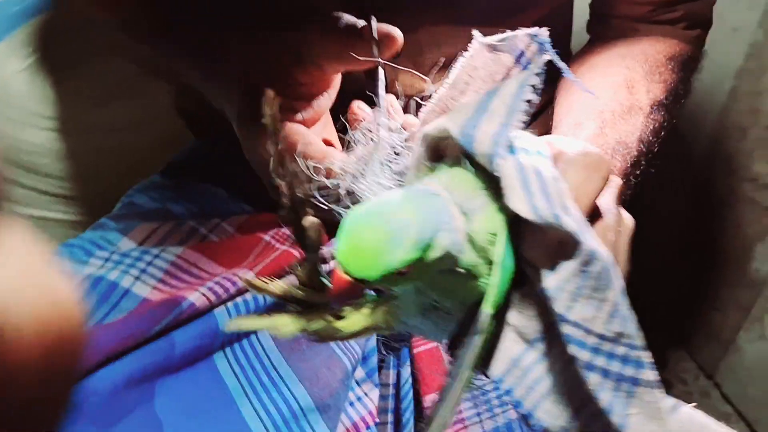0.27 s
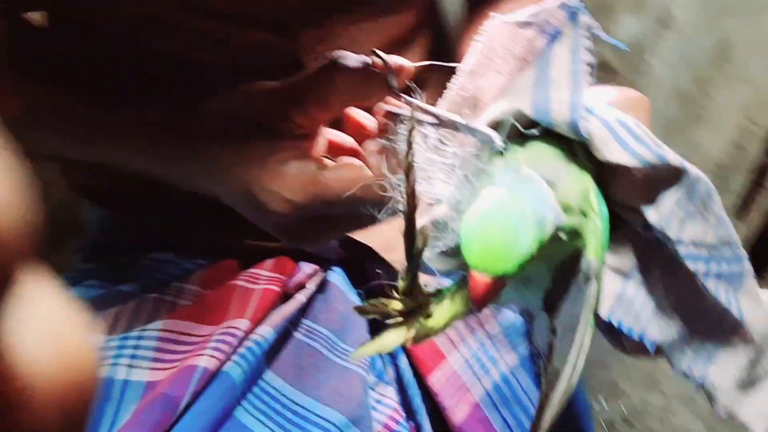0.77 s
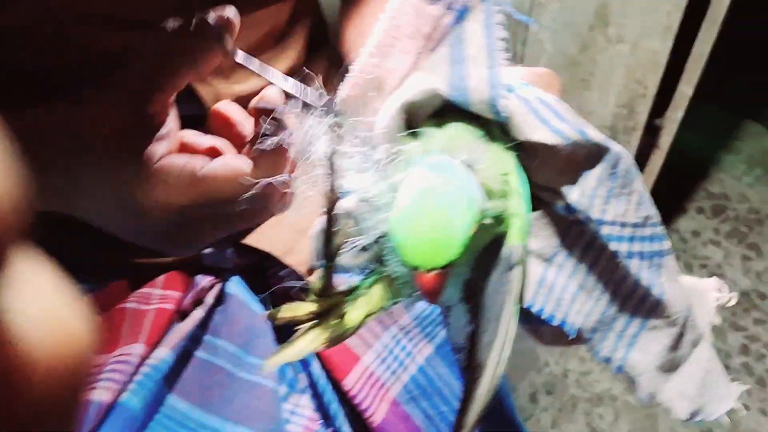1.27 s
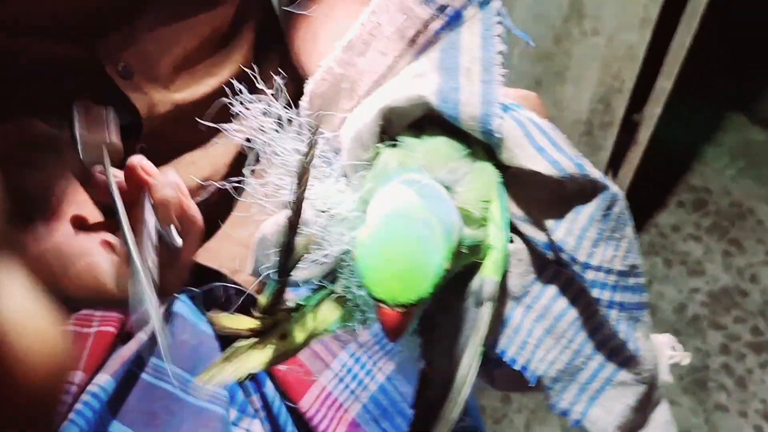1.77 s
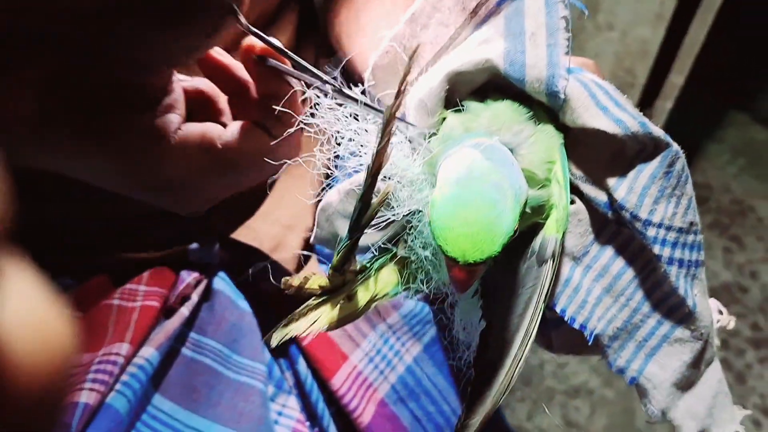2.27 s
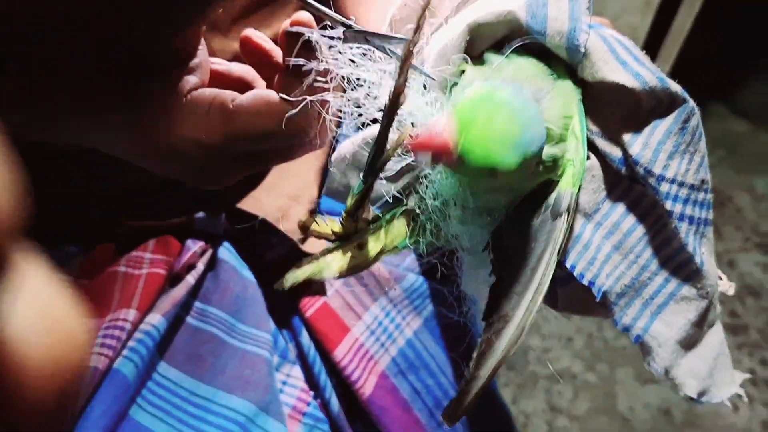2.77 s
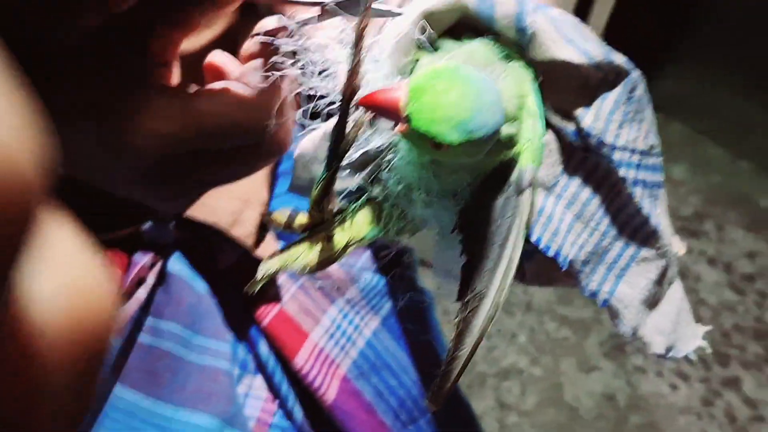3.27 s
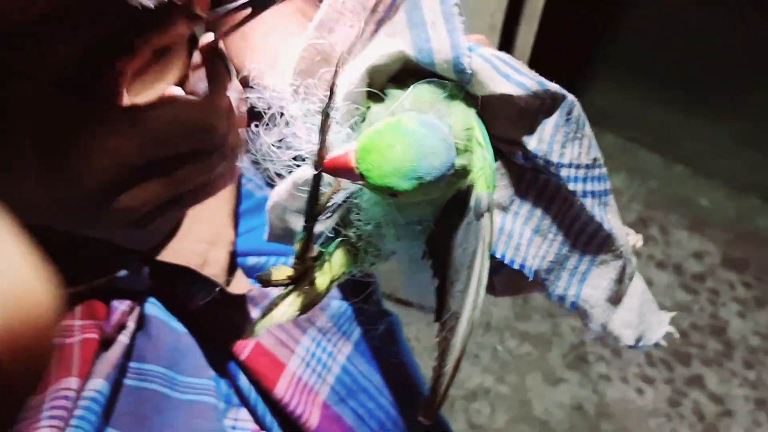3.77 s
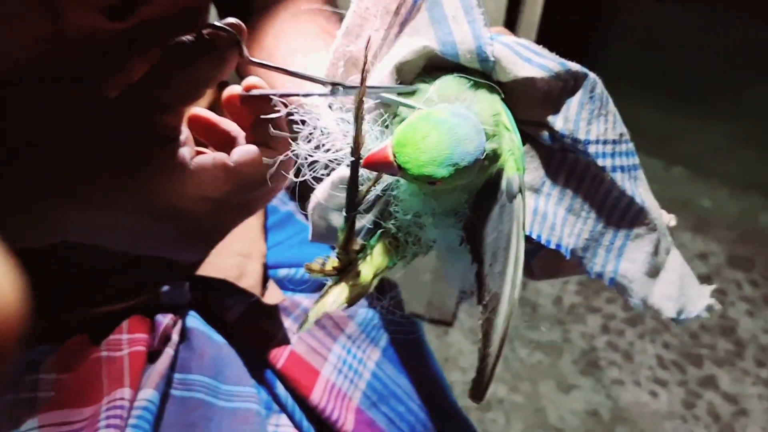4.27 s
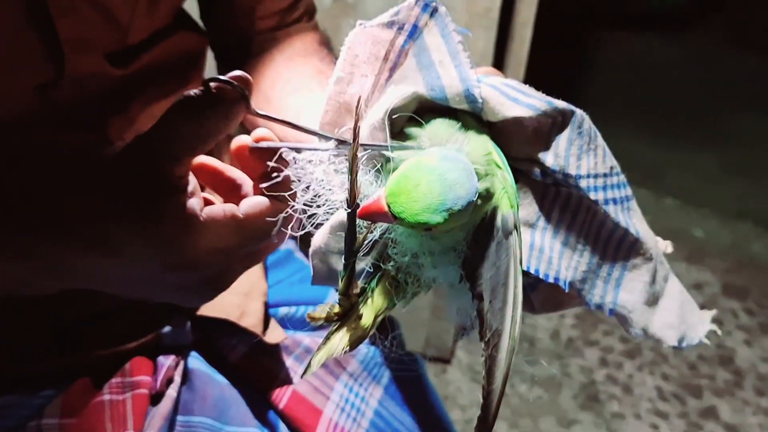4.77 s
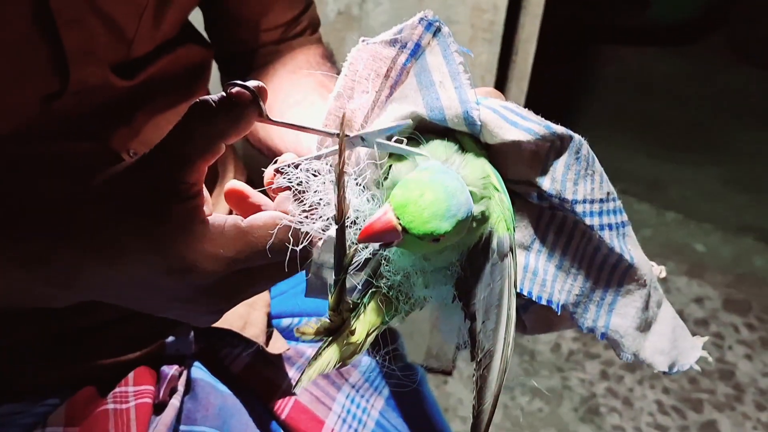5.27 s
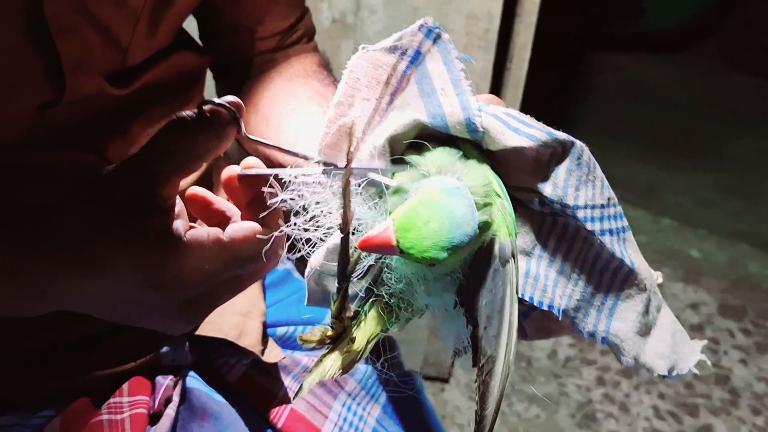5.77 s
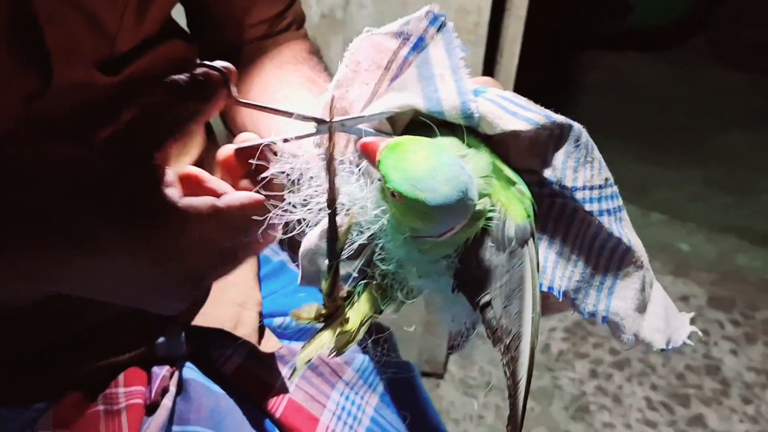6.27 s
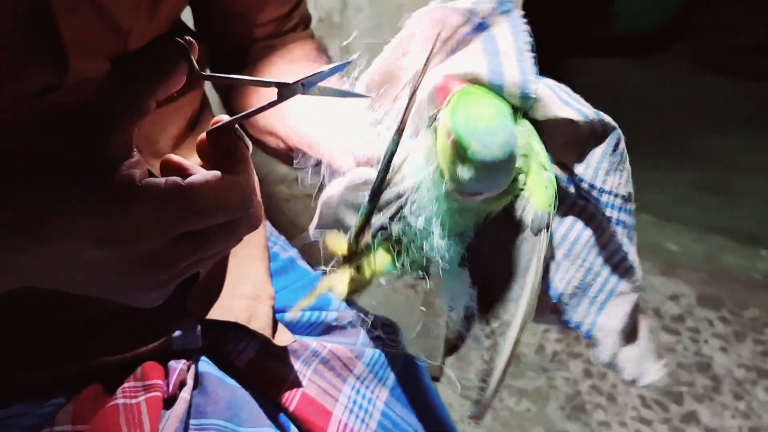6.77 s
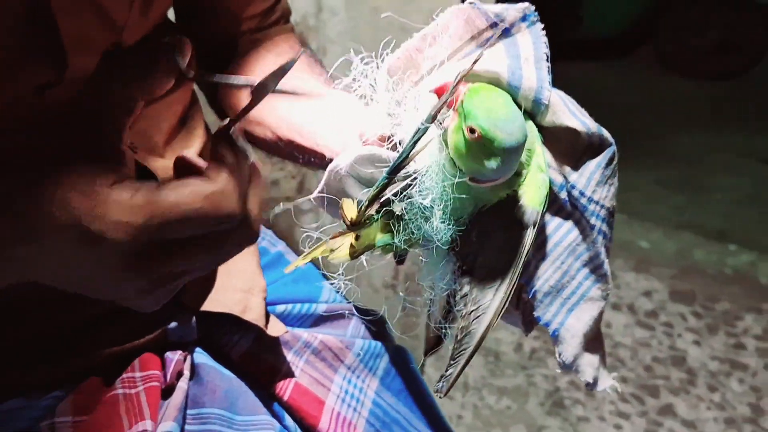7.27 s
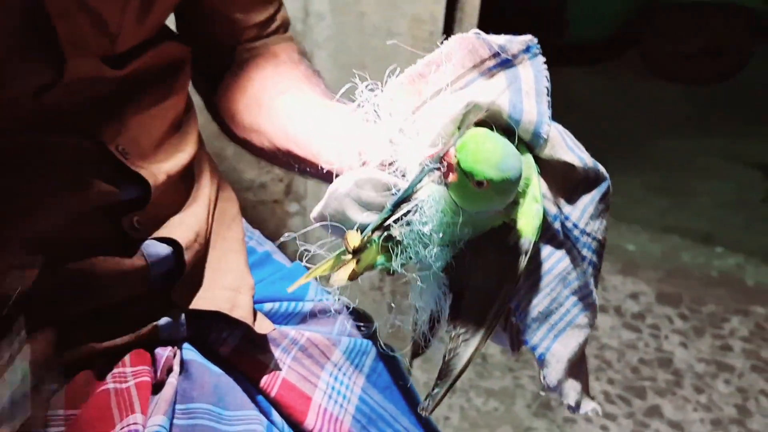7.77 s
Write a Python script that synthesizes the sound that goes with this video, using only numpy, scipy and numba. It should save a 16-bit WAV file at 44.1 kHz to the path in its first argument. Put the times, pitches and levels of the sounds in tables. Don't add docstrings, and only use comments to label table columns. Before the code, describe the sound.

A held parakeet screeches harshly eight times, each a rasping half-second burst, over night insects, faint cloth rustle and tiny scissor ticks.

```python
import sys
import numpy as np
from scipy import signal
from scipy.fft import rfft, irfft
from scipy.io import wavfile
from numba import njit

SR = 44100
rng = np.random.default_rng(int(sys.argv[2]) if len(sys.argv) > 2 else 0)


def master_out(mix):
    frames = np.transpose(np.atleast_2d(mix))
    ceiling = np.clip(frames, -1, 1)
    pcm = np.round(ceiling * 32767).astype(np.int16)
    wavfile.write(sys.argv[1], SR, pcm)


def ratio_of_db(decibels):
    return 10 ** (np.asarray(decibels, float) / 20)


N = 353285
TIME = np.arange(N) / SR
FREQ = np.fft.rfftfreq(N, 1 / SR) + 1e-9

# first burst in seconds, last burst in seconds, number of bursts,
# lag of the middle bursts behind an even pace in ms, extra lag early and lead late in ms.
SCREECHES = [
    (-.0429, .4653, 49, 3.7, -1.5),
    (2.6356, 3.2209, 57, 3.1, 2.2),
    (3.565, 4.0878, 49, 6, 2.2),
    (4.4321, 4.9451, 46, -3.3, .3),
    (5.3242, 5.8996, 54, 2.5, 1.4),
    (6.1409, 6.5983, 43, 1.7, 0),
    (6.8736, 7.3596, 46, .5, 1.7),
    (7.7323, 8.2489, 45, 0, 0),
]
# top rate in Hz, sag in Hz per second.
SNAP_RATES = [(1090, 340), (1065, 210), (1055, 280), (1060, 330), (1075, 250), (1190, 540), (1100, 370),
              (1060, 420)]
# first harmonic in dB, swell towards the middle in dB, fade at the end
# in dB, loss of treble from start to end in dB, background turned down after it in dB.
EFFORTS = [(-35, 0, 10, 3, 9.5), (-37.5, -0.5, 9.5, 0.5, 12.5), (-37.5, 1.5, 11.5, 1, 7),
           (-33, 2.5, 11.5, 6.5, 8), (-34.5, 1, 8, 6.5, 8), (-32, 0.5, 4.5, -1.5, 7.5),
           (-32, 2, 12.5, -2.5, 7.5), (-33.5, 5, 3, 2, 4)]
# beak resonance in Hz, throat, beak and rasp in dB beside
# the first harmonic, left minus right in dB.
HEAD_POSES = [(5140, 6.5, 14.5, 1.5, 3), (5650, 8, 15.5, 4.5, 3.5), (5400, 5.5, 15.5, 2, 3),
              (6450, 4, 14.5, 5, 1), (5830, 4.5, 14, 6.5, 1), (5800, 4.5, 11, 3, 1), (5370, 5, 12, 1.5, 1),
              (4860, 5.5, 14.5, 0, 2)]
ATTACKS_DB = [6.4, 5.1, 4.9, 4.6, 4.2, 3.9, 3.3, 8.8]
STRAIN = [0.48, 1.18, 1]
DULLING = [.6, 1.2, 0.47]
# frequency in Hz, gain in dB.
TRACT_TONE = [(150, -36), (200, -31.5), (300, -27.5), (600, -34.5), (780, -15), (1300, -14.5), (2100, 1.5),
              (3300, 7), (5200, 7.5), (7600, 0.5), (8500, -16), (9300, -25.5), (10500, -26.5), (15900, -31)]
VOICE_BORDERS_HZ = [1550, 3700, 9000]
# frequency in Hz, gain in dB.
YARD_TONE = [(500, -18.5), (1000, 1), (2000, 7), (5000, -2.5), (8000, -7), (12000, 6), (16000, -16)]
# start in seconds, level in dB, pitch in Hz.
TICKS = [
    (1.51, -45, 1570),
    (1.3, -58, 1440),
    (1.1, -62, 2700),
    (1.9, -58, 4800),
]
# start in seconds, level in dB, length in seconds, centre in Hz,
# thud beside the rub in dB.
RUSTLES = [
    (0.641, -59, 0.11, 3350, -26),
    (0.89, -60, 0.14, 2600, -9),
    (1.362, -60, 0.092, 3420, -11.5),
    (1.486, -58, 0.095, 1910, -30),
    (1.706, -71, 0.021, 3000, 5),
    (3.494, -69.5, 0.023, 4000, -18),
    (5.043, -84.5, .04, 1500, -24.5),
    (7.597, -67, 0.086, 3960, -21),
]
# middle in seconds, level in dB, length in seconds.
CHIRPS = [(0.8, -67, 0.052), (1.124, -63, 0.053), (1.53, -69.5, 0.18), (1.906, -66.5, 0.17),
          (2.193, -57.5, 0.063), (2.562, -57, 0.06), (3.302, -61, 0.053), (4.398, -57.5, 0.034),
          (5.2, -61, 0.061), (5.95, -60, 0.051), (6.674, -64, 0.054)]
# frequency in Hz, gain in dB.
AIR_TONE = [(130, -37), (170, -9.5), (400, -13.5), (800, -16.5), (1200, -18), (3000, -17), (4500, -17.5),
            (5200, -17.5), (8500, -19), (9400, -34), (11500, -39.5), (15900, -43)]
# middle in seconds, change in dB, length in seconds.
BREEZE = [
    (1.25, -4.5, 0.11),
    (2.0, 3, .2),
    (2.494, -0.5, .12),
    (3.4, -0.5, .1),
    (4.227, -5, 0.057),
    (5.078, 4.5, 0.065),
]
# time in seconds, firing rate in Hz, level of the drone in dB.
MOTOR = [
    (4.3, 36.5, -56.5),
    (4.81, 37.72, -52.5),
    (5.87, 38.8, -54.5),
    (6.56, 39.6, -51.5),
    (7.74, 43.4, -61),
    (8.01, 43.2, -50),
]
# multiple of the firing rate, level in dB.
MOTOR_HARMONICS = [(1, -19.5), (2, -6.5), (3, -7.5)]
# middle in seconds, rise in dB, length in seconds.
HUM_SWELLS = [
    (0.0, 8.5, .15),
    (2.004, 7.5, 0.22),
    (4.1, 2, 0.14),
    (5.702, 8.5, 0.13),
    (6.498, 6.5, 0.1),
]
# frequency in Hz, gain in dB.
HUM_TONE = [(12, -52.5), (20, -29), (41, -5), (70, 1.5), (119, -9), (131, -6), (156, -20.5), (182, -38),
            (200, -29.5), (260, -62.5), (440, -120)]


def parakeet():
    low_db, push_db, beak_hz, throat_db, beak_db, rasp_db, pan_db = effort()
    beat, snap_hz, burst_db = bursts()
    snaps = voice_box(beat, snap_hz, burst_db)
    choke = shape(clicks(beat, np.ones(len(beat))), band(0, 98))
    puffs = choke * pair(shape(noise(), FREQ ** 2 / (FREQ ** 2 + 7500 ** 2)), .1)
    smear_s, smear_hz = .0004, 4500
    smear = np.exp(1j * smear_s * smear_hz * np.cos(2 * np.pi * FREQ / smear_hz))
    source = shape(unit(snaps) + ratio_of_db(-5.5) * unit(puffs), causal(colour(TRACT_TONE)) * smear)
    source += np.array([ring(x, beak_hz, 1200.) for x in source])

    pipe_hz = 0.93 * np.interp(TIME, beat, snap_hz)
    lifted = shape(source, 1 + (787 / FREQ) ** 4 / (1 + (560 / FREQ) ** 8))
    pipe = np.array([ring(x, pipe_hz, 545.) for x in lifted])

    above = [1 / (1 + (edge / FREQ) ** 12) for edge in VOICE_BORDERS_HZ]
    regions = [1 - above[0], above[0] - above[1], above[1] - above[2], above[2]]
    voices = (pipe + 0.74 * source, source, source, source)
    region_db = (0, throat_db, beak_db, rasp_db)
    shades = (0.34, 0.14, 2.48, 0.33)
    sounding = np.mean(shape(choke, band(0, 30)) > .5 * choke.mean())
    out = ratio_of_db(push_db - 65) * unit(pair(shape(noise(), band(380, 150)), .85))
    for voice, region, rel_db, shade in zip(voices, regions, region_db, shades):
        layer = unit(shape(voice, region)) * np.sqrt(sounding)
        out = out + layer * ratio_of_db(low_db + rel_db + shade * np.array([pan_db, -pan_db]) / 2)
    port_lag_s = .00009
    return np.array([out[0], shape(out[1], np.exp(-2j * np.pi * FREQ * port_lag_s))])


def voice_box(beat, snap_hz, burst_db):
    rise_s, fall_s, lead_s = 0.0011, 0.0019, 0.000401
    chance = rng.standard_normal((len(beat), 3, 11))
    period = (1 + .02 * chance[:, 2, :1]) / (1.035 * snap_hz[:, None])
    step = np.arange(-5, 6)
    place = step + .015 * step ** 2 + .025 * chance[:, 0] + .16 * chance[:, 2, 1:2]
    offset = place * period - lead_s
    swell = np.exp(-.5 * np.abs((offset + lead_s) / np.where(step < 0, rise_s, fall_s)) ** 3.4)
    swell *= ratio_of_db(4 * (-1.) ** step + burst_db[:, None])
    scatter_db = 1.3 * chance[:, 1] + .8 * chance[:, 2, 2:3]
    return clicks(beat[:, None] + offset, swell * ratio_of_db(scatter_db))


def bursts():
    pickup_s, pickup_db, stumble_s = .0055, -5, .0002
    rows = []
    for (start, end, count, lag_ms, skew_ms), (top_hz, sag) in zip(SCREECHES, SNAP_RATES):
        u = np.arange(count + 1) / count
        lag_s = (4 * lag_ms + 10 * skew_ms * (1 - 2 * u)) * u * (1 - u) / 1000
        t = np.r_[start - pickup_s, start + (end - start) * u + lag_s]
        t = t + stumble_s * rng.standard_normal(len(t))
        scoop = 300 * np.exp(-np.maximum(t - start, 0) / .012)
        droop = 110 * np.exp((t - end) / .045)
        hz = top_hz - sag * (t - start) - scoop - droop
        level_db = pickup_db * (t < start - pickup_s / 2)
        rows.append(np.array([t, hz, level_db])[:, (t > 0) & (t < N / SR)])
    return np.hstack(rows)


def effort():
    start, end = np.transpose(SCREECHES)[:2]
    which = np.searchsorted(start - .06, TIME) - 1
    age = TIME - start[which]
    u = np.clip(age / (end - start)[which], 0, 1)
    top_db, swell_db, fade_db, dull_db = np.transpose(EFFORTS)[:4, which]
    beak_hz, throat_db, beak_db, rasp_db, pan_db = np.transpose(HEAD_POSES)[:, which]
    attack_db = np.array(ATTACKS_DB)[which] * np.exp(-np.maximum(age, -.03) / 0.014)
    push = -attack_db - swell_db * (1 - u) ** 2 - fade_db * u ** 6.03
    upper = [db + strain * push + share * dull_db * (.5 - u)
             for db, strain, share in zip((throat_db, beak_db, rasp_db), STRAIN, DULLING)]
    release_db = 599 * np.maximum(TIME - end[which], 0)
    low_db = top_db + push - release_db
    return low_db, low_db - top_db, beak_hz + 700 * (.5 - u), *upper, pan_db - 0.19 * push


def yard(x):
    near = 0
    for start, end, *_ in SCREECHES:
        screech = x * (TIME > start - .05) * (TIME < end + .05)
        near = near + echo(screech, -10, .008, .0004)
    return x + near + echo(shape(x, colour(YARD_TONE)), -10, 0.18, 0.0051)


def nail_scissors():
    out = 0
    for s, db, hz in TICKS:
        fade = (TIME > s) * ratio_of_db(-60 * np.abs(TIME - s) / 0.011)
        out = out + ratio_of_db(db) * fade * np.sin(2 * np.pi * hz * (TIME - s))
    return out


def cloth():
    clumps_db = 4 * unit(shape(rng.standard_normal(N), band(0, 150)))
    grain = ratio_of_db(clumps_db + 2.5 * rng.exponential(size=N))
    out = 0
    for s, db, length, hz, thud_db in RUSTLES:
        age = np.clip(TIME - s, 0, None) / length
        hiss = noise()
        rub = unit(shape(hiss * grain, (FREQ * hz / (FREQ ** 2 + hz ** 2)) ** 1.9))
        thud = unit(shape(hiss, band(277, 61) + .5 * band(640, 120)))
        envelope = np.tanh(6 * age) * np.exp(-2 * age ** 2)
        out = out + ratio_of_db(db) * envelope * pair(rub + ratio_of_db(thud_db) * thud, .6)
    return out


def night():
    gain_db = duck()
    out = ratio_of_db(gain_db - 61.5) * insect(83, .04, 3800, 115, 1.0)
    rasp = insect(124, .08, 6120, 210, 1.3) + ratio_of_db(-7) * insect(60, .08, 7620, 170, 1.5)
    out += ratio_of_db(gain_db - 63.5) * rasp
    whirr = insect(253.5, 0.0016, 13500, 1500, 4.9, sweep_s=0.0028) * ratio_of_db([[-4], [3]])
    out += ratio_of_db(gain_db - 57.5 - 0.43 * TIME) * whirr
    air = unit(pair(shape(noise(), colour(AIR_TONE)), 0.18))
    out += ratio_of_db(gain_db - 62.5 + swells(BREEZE)) * air
    return out + crickets()


def insect(rate_hz, jitter, hz, width_hz, wet, sweep_s=0.):
    t = np.arange(0, N / SR, 1 / rate_hz)
    chance = rng.standard_normal((len(t), 2)).T
    strokes = unit(clicks(t + jitter * np.cumsum(chance[0]) / rate_hz, ratio_of_db(1.8 * chance[1])))
    sweep = np.exp(-1j * np.pi * sweep_s * (FREQ - hz) ** 2 / width_hz)
    return unit(shape(strokes + wet * noise(), band(hz, width_hz) * sweep))


def crickets():
    loudness = sum(ratio_of_db(db) * np.exp(-(2 * (TIME - s) / length) ** 2) for s, db, length in CHIRPS)
    bend = sum(9 * np.exp(-(2 * (TIME - s + length) / length) ** 2) for s, db, length in CHIRPS)
    wobble = unit(shape(rng.standard_normal(N), band(0, 11)))
    ears = np.array([[0], [1.6]])
    return 1.9 * loudness * np.sin(2 * np.pi * 3390 * TIME + 2.1 * wobble + bend + ears)


def rumble():
    hz, db = curves([MOTOR])
    turns = 2 * np.pi * np.cumsum(hz) / SR
    rough = shape(rng.standard_normal((len(MOTOR_HARMONICS), N)), band(0, 3.8))
    drone = sum(ratio_of_db(level + 2.0 * unit(r)) * np.sin(k * turns)
                for (k, level), r in zip(MOTOR_HARMONICS, rough))
    drone *= 0.91 * ratio_of_db(db) * np.clip((TIME - MOTOR[0][0]) / 0.18, 0, 1)
    hum = unit(pair(shape(noise(), colour(HUM_TONE)), 0.72))
    return drone + ratio_of_db(duck() - 56 + swells(HUM_SWELLS)) * hum


def duck():
    onset_s, recover_s = .05, 3.3
    drops = []
    for (start, end, *_), row in zip(SCREECHES, EFFORTS):
        onset = np.clip((TIME - start) / onset_s, 0, 1)
        drops.append(row[4] * onset * np.exp(-np.maximum(TIME - end, 0) / recover_s))
    return -np.max(drops, axis=0)


def swells(table):
    return sum(db * np.exp(-((TIME - s) / length) ** 2) for s, db, length in table)


def noise():
    return rng.standard_normal((2, N))


def unit(x):
    return x / np.sqrt(np.mean(x ** 2))


def shape(x, gain):
    return irfft(rfft(x) * gain, N)


def colour(points):
    hz, db = np.transpose(points)
    return ratio_of_db(np.interp(np.log(FREQ), np.log(hz), db))


def band(hz, width_hz):
    return np.exp(-.5 * ((FREQ - hz) / width_hz) ** 2)


def causal(gain):
    c = irfft(np.log(gain + 1e-6), N)
    c[1:N // 2] *= 2
    c[N // 2 + 1:] = 0
    return np.exp(rfft(c))


@njit
def ring(x, hz, width):
    y, b, l = np.empty(len(x)), 0., 0.
    for i in range(len(x)):
        g = np.tan(np.pi * hz[i] / SR)
        k = width / hz[i]
        v = (b + g * (x[i] - l)) / (1 + g * (g + k))
        b, l, y[i] = 2 * v - b, l + 2 * g * v, k * v
    return y


def curves(tables):
    s, *columns = np.transpose(np.vstack(tables))
    return [np.interp(TIME, s, c) for c in columns]


def clicks(seconds, size):
    at, out, taps = np.ravel(seconds) * SR, np.zeros(N + 64), np.arange(-8, 9)
    spot = np.floor(at)[:, None] + taps
    gap = spot - at[:, None]
    pulse = np.sinc(gap) * np.cos(gap * np.pi / 18) ** 2
    np.add.at(out, np.clip(spot, 0, N + 63).astype(int), np.ravel(size)[:, None] * pulse)
    return out[:N]


def pair(x, like):
    return np.sqrt(1 + like) * x[0] + np.sqrt(1 - like) * np.array([x[1], -x[1]])


def echo(x, db, t60, gap):
    t = TIME[:int(t60 * SR)]
    tail = rng.standard_normal((2, SR // 2))[:, :len(t)] * ratio_of_db(-60 * t / t60) * (t > gap)
    tail = tail / np.sqrt(np.sum(tail ** 2, axis=1, keepdims=True))
    return ratio_of_db(db) * signal.fftconvolve(x, tail, axes=1)[:, :N]


def scene():
    return yard(parakeet()) + nail_scissors() + cloth() + night() + rumble()


def band_limit(x):
    return signal.sosfilt(signal.butter(12, 16480, fs=SR, output="sos"), x)


def record(dry):
    mix = np.clip(shape(dry, 1 / (1 + (FREQ / 15930) ** 300)), -1, 1)
    return band_limit(mix)


dry = scene()
out = record(dry)
master_out(out)
```